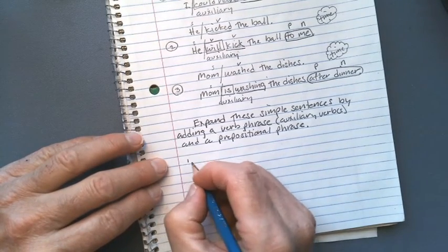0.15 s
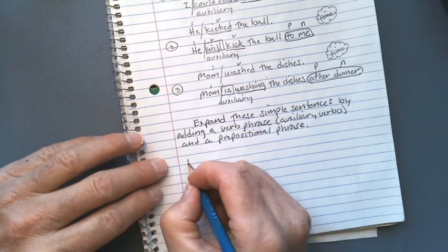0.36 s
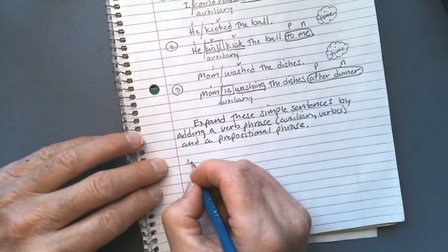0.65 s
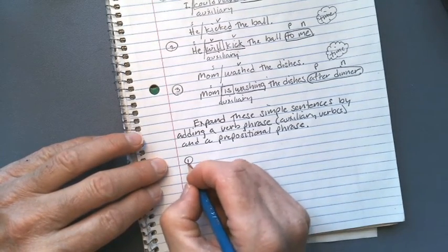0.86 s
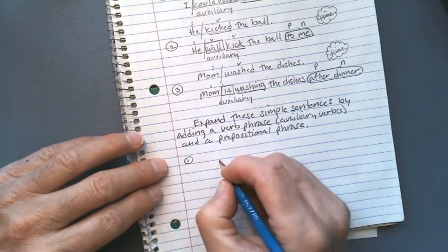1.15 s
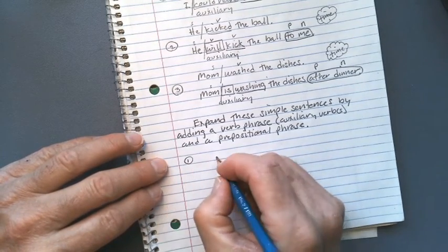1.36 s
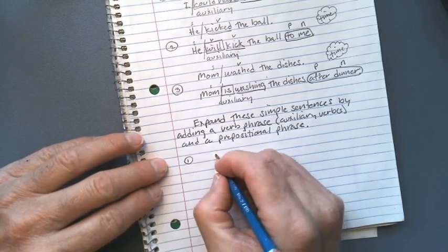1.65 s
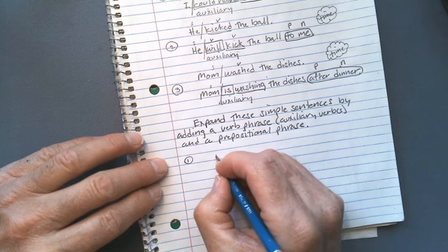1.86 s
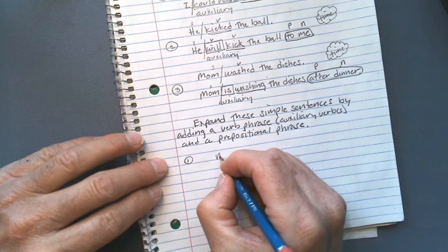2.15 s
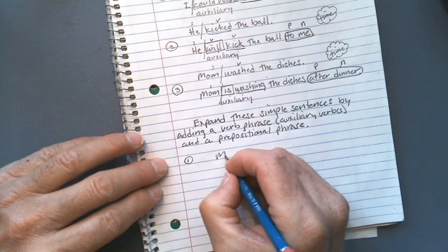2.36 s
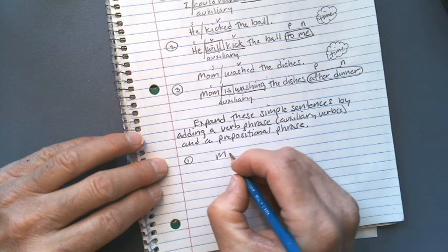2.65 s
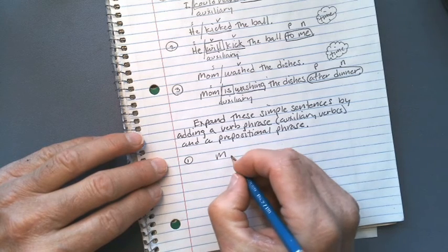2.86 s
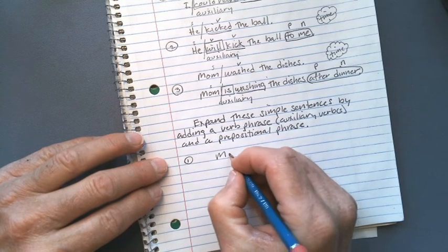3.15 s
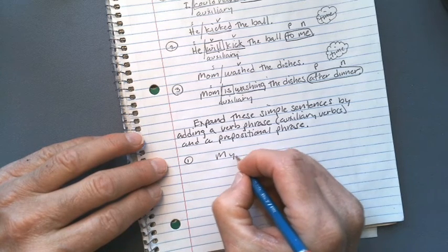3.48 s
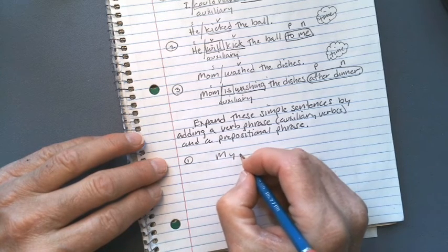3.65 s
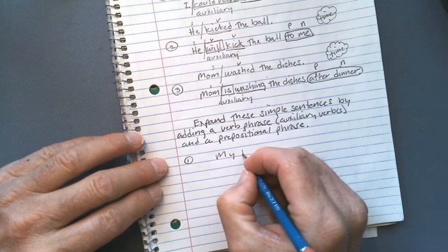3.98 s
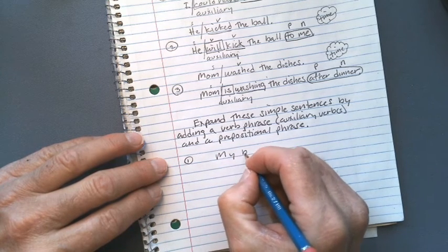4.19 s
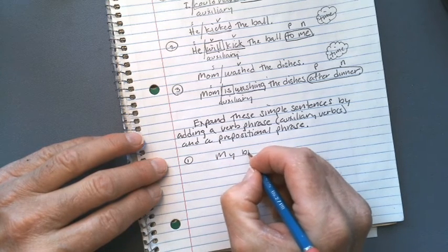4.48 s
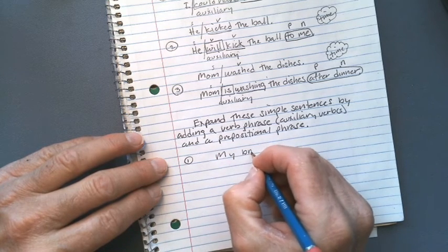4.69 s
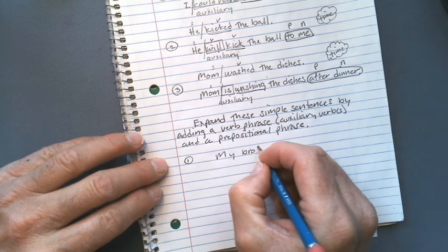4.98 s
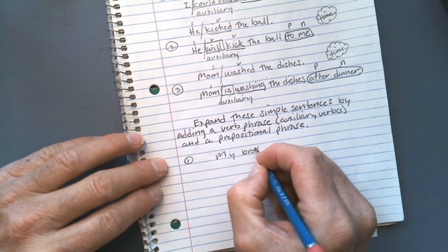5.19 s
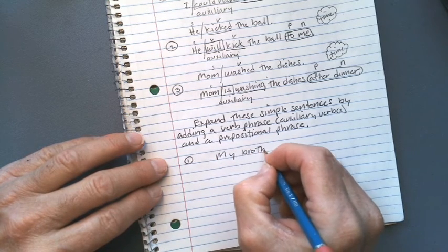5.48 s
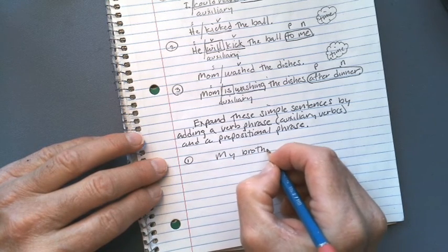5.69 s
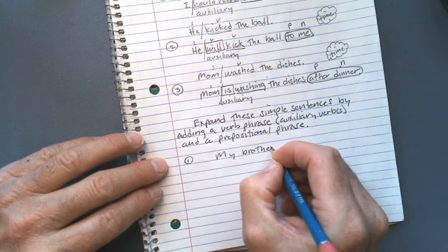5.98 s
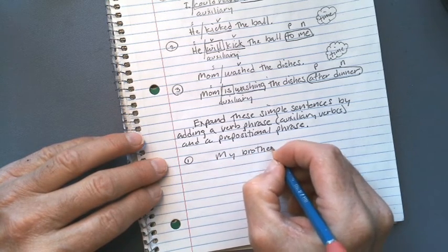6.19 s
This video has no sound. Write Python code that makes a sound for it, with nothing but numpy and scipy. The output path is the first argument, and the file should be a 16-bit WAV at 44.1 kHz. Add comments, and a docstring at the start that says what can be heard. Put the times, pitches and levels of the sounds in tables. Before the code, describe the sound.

Quiet handwriting: brief papery pencil scrapes and a few soft slides, dull deep bumps through the desk, over low room hum and faint hiss.

```python
"""Short dry scratches of a pencil, with a few softer slides, over low thuds of a desk and a quiet room.
The lead scrapes over paper fibres and rings the pencil: random clicks drive banks of resonances.
The hand pushes the desk, on which the notebook lies, into a low wobble with an uneven shake around it.
Mains hum is a pair of wavering tones; rumble, drone and hiss of air in the room are shaped noise."""
import sys
import numpy as np
from scipy import signal
from scipy.fft import rfft, irfft
from scipy.io import wavfile
from scipy.ndimage import uniform_filter1d

SR = 44100
rng = np.random.default_rng(int(sys.argv[2]) if len(sys.argv) > 2 else 0)


def volts_from_db(level):
    """Convert decibel levels to linear amplitude ratios."""
    exponent = np.asarray(level, float) / 20
    return 10 ** exponent


def unload_audio(sound):
    """Save the sound as a 16-bit wav file, at the path given as the first command line argument."""
    columns = np.transpose(np.atleast_2d(sound))
    # keep every value between -1 and 1, then stretch to whole-number steps
    steps = np.round(np.clip(columns, -1, 1) * 32767)
    wavfile.write(sys.argv[1], SR, steps.astype(np.int16))


N = 279153  # samples in the scene


def pencil():
    """The lead strokes the paper, and the hand and lightly resting lead glide on to the next letter."""
    # strokes of the lead: (peak time [s], length [s], strength [dB],
    #   speed, lifts the upper ring [dB], pressure, lifts the wooden shaft [dB])
    strokes = [(0.009, 0.07, -85.0, 5.0, 0.0), (0.549, 0.11, -71, 3.5, -11),
               (0.576, 0.06, -67.5, 4.0, -19.0), (0.603, 0.053, -72, 5, 3), (0.645, 0.13, -68.5, 1, -1),
               (0.686, 0.055, -64.5, 4, -8.5), (0.748, 0.072, -72.0, 3.5, 4.5),
               (1.526, 0.055, -81.0, 3.0, -5.0), (1.793, 0.089, -70.5, 1.0, -3.0),
               (1.919, 0.077, -66.0, 0.5, -6.0), (2.021, 0.057, -68, -2.0, 0.5),
               (2.125, 0.057, -63.5, -1.0, -9), (2.202, 0.06, -65.5, -3.5, -2.0),
               (3.149, 0.074, -74.5, -5.0, 2.5), (3.225, 0.048, -69.5, 3, -2), (3.298, 0.075, -69, 0.5, 6),
               (3.879, 0.064, -68.0, -6.0, 1.5), (3.992, 0.078, -68.5, -1.5, -2.5),
               (4.054, 0.057, -70.5, -3.5, 1.0), (4.127, 0.12, -76.5, -1.0, 2.5),
               (4.344, 0.052, -70.5, -2, 0.0), (4.452, 0.081, -73.5, 0.0, 3.0),
               (4.545, 0.091, -73.0, -4.0, 1.5), (4.631, 0.058, -70.5, 1, -3),
               (4.697, 0.069, -71.0, -3.0, 1.5), (4.906, 0.071, -67.5, -3.5, 1.0),
               (5.149, 0.097, -72.5, 3.5, -8.0), (5.169, 0.056, -70.0, -5.0, -8.0),
               (5.219, 0.066, -67.5, -6, 2.0), (5.33, 0.047, -70, 1.0, -2), (5.401, 0.066, -71, -4.5, 0.5),
               (5.484, 0.076, -79.0, 2, -11.0), (5.657, 0.07, -75, 2.0, 3.0), (5.733, 0.079, -70.5, 0, 2),
               (5.818, 0.077, -67.5, 0.5, -4.0), (6.224, 0.05, -69, -8.0, -4), (6.326, 0.05, -65.5, 0, -5)]
    # glides to the next letter: (peak time [s], length [s], level [dB])
    slides = [(0.851, 0.075, -63), (2.402, 0.13, -67), (3.396, 0.055, -69.5), (3.446, 0.084, -67),
              (5.922, 0.106, -71.5), (6.002, 0.11, -71), (6.085, 0.14, -76)]
    out = np.zeros(N + 2 * SR)  # a spare second at each end
    grips = rng.standard_normal((len(strokes), 3, 2, 5))  # stroke, part, (level, shift), mode
    slants = rng.standard_normal(len(strokes))
    for row, grip, slant in zip(strokes, grips, slants):
        sound = stroke(row, grip, slant)
        start = round((1 + row[0] - row[1]) * SR)
        out[start:][:len(sound)] += sound
    for peak_s, length_s, level_db in slides:
        sound = slide(length_s, level_db)
        start = round((1 + peak_s - length_s) * SR)
        out[start:][:len(sound)] += sound
    return out[SR:SR + N]


def stroke(row, grip, slant):
    """The lead rasps on paper and rings the pencil; speed lifts the upper ring, pressure the shaft."""
    # what the pencil rings with, by part:
    # (frequency [Hz], width [Hz], level [dB], gain per dB of lean [dB])
    shaft = [(1035, 600, -1.5, -0.35), (1670, 320, -4.5, -.5), (2320, 350, -3.5, -.4), (2755, 630, -1.5, 0),
             (3130, 330, -5, -0.6)]
    middle = [(6000, 660, -1, -0.12), (6580, 510, 0, -.9), (7460, 550, 0, .8), (8200, 450, -2, 0.58),
              (8840, 450, -3, .1)]
    upper = [(9520, 450, -4, -0.78), (10180, 410, -2, -.2), (10830, 550, 1, 0.55), (11700, 450, -1.5, -.6),
             (12500, 500, -8, .1)]
    # broad rasp of the paper: (frequency [Hz], level [dB])
    paper = [(800, -3), (1500, -6), (3000, -9), (4500, -2), (5200, -7), (6000, -4), (12000, -5.5),
             (13050, -3), (13600, 3), (14300, 0), (14900, 2), (15700, 1)]
    peak_s, length_s, strength_db, speed_db, pressure_db = row
    # the slant shifts weight between modes and drifts as the hand crosses the page
    lean_db = -3.5 + 1.3 * peak_s + 0.5 * slant
    fibres, swell = rub(length_s)
    rasp_db = -0.3 + np.mean([0, speed_db, pressure_db])  # against the mean of the three rings
    sound = volts_from_db(rasp_db) * colour(fibres, paper)
    sound += ring(fibres, middle, lean_db, grip[0])
    sound += volts_from_db(speed_db) * ring(fibres, upper, lean_db, grip[1])
    sound += volts_from_db(pressure_db) * ring(fibres, shaft, speed_db - pressure_db, grip[2])
    return volts_from_db(strength_db) * swell * sound


def slide(length_s, level_db):
    """Skin and resting lead brush over the fibres; coloured by a smooth spectrum, without a ring."""
    # brushing sound: (frequency [Hz], level [dB])
    skin = [(1500, -0.5), (3000, -6.5), (4800, -3.5), (6200, 0), (7700, -5.5), (9000, -1), (10500, -4.5),
            (12500, -9), (15700, -18)]
    fibres, swell = rub(length_s)
    return volts_from_db(level_db) * swell * colour(fibres, skin)


def rub(length_s, fibres_per_s=16000, spread_db=1.6, flutter_db=1.0, rise=0.37, flat=2.5):
    """Paper fibres snapping at random, and the swell of one movement: quick start, slower lift."""
    t = np.arange(-length_s, 1.1 * length_s, 1 / SR)  # 0 at the peak
    side_share = np.where(t < 0, rise, 1 - rise)
    speed = np.exp(-abs(t / side_share / length_s) ** flat)
    hit, size, side, grain = rng.random((len(t), 4)).T
    snaps = hit < fibres_per_s / SR
    fibres = snaps * np.sign(side - 0.5) * volts_from_db(-spread_db * np.log(size + 1e-4))
    tooth = evened(uniform_filter1d(grain - 0.5, size=200))  # paper is uneven over a few ms
    return fibres, speed * volts_from_db(flutter_db * tooth)


def ring(x, modes, lean_db, grip, grip_db=2.5, shift=0.013):
    """Steep-skirted modes added in power; the grip changes the level and pitch of each a little; rms 1."""
    hz = np.fft.rfftfreq(len(x), 1 / SR)[:, None]
    mode_hz, width_hz, level_db, response = np.transpose(modes)
    level_db = level_db + lean_db * response + grip_db * grip[0]
    mode_hz = mode_hz * (1 + shift * grip[1])
    power = volts_from_db(2 * level_db) / (1 + (2 * (hz - mode_hz) / width_hz) ** 2) ** 2
    return evened(irfft(rfft(x) * np.sqrt(power.sum(axis=1)), len(x)))


def desk():
    """Each push swings the desk top at its low mode, with a looser shake around it, then it dies away."""
    # pushes of the hand on the desk: (start [s], length [s], level [dB])
    pushes = [(0.0, 0.039, -45.5), (0.054, 0.051, -51), (0.49, 0.086, -43.5), (0.607, 0.096, -46.5),
              (0.82, 0.1, -43.5), (1.392, 0.209, -53), (1.916, 0.13, -43.5), (2.04, 0.06, -49.0),
              (2.147, 0.15, -43), (2.469, 0.077, -53.5), (2.719, 0.076, -53.5), (2.819, 0.087, -49.5),
              (3.113, 0.076, -46), (3.265, 0.06, -46.5), (3.329, 0.068, -46.5), (3.426, 0.076, -47.9),
              (3.851, 0.14, -38.5), (4.156, 0.086, -51.3), (4.32, 0.066, -53.5), (4.424, 0.113, -41),
              (4.635, 0.136, -53), (4.77, 0.059, -54), (4.877, 0.1, -39), (5.016, 0.057, -44.5),
              (5.098, 0.11, -37.5), (5.264, 0.098, -45), (5.569, 0.097, -40), (5.832, 0.093, -42.5),
              (5.993, 0.13, -49), (6.238, 0.1, -43)]
    desk_hz, spread_hz = 40.7, 1.1  # the weight of the hand moves the wobble a little each time
    rise_s, decay_db_per_s = 0.025, 170.5
    let_go = 0.72  # share of the length after which the push dies away
    rest_db, rest_waver_db = -61, 3  # faint wobble under the resting hand
    shake_db = -9  # against the wobble
    t = np.arange(N) / SR
    power = volts_from_db(2 * (rest_db + rest_waver_db * wander(3.0)))
    pull = np.zeros(N)
    for (start_s, length_s, level_db), offset in zip(pushes, rng.standard_normal(len(pushes))):
        rise = 0.5 + 0.5 * np.tanh((t - start_s) / rise_s)
        free_s = np.maximum(t - start_s - let_go * length_s, 0)
        push = (rise * volts_from_db(level_db - decay_db_per_s * free_s)) ** 2
        power = power + push
        pull = pull + offset * push
    hz = desk_hz + spread_hz * pull / power  # the strongest push sets the pitch
    swing = np.sqrt(2) * np.sin(2 * np.pi * (np.cumsum(hz) / SR + rng.random()))
    shake = colour(rng.standard_normal(N), [(8, -10.5), (16, -2.5), (27, -5.5), (38, 0.5),
                                            (52, -0.5), (75, -10), (95, -50.0)])
    return np.sqrt(power) * (swing + volts_from_db(shake_db) * shake)


def hum():
    """Mains tones: sines whose levels waver a little."""
    # (frequency [Hz], level [dB], wavering [dB rms])
    tones = [(60.13, -52, 1.25), (120.65, -62.5, 1.5)]
    t = np.arange(N) / SR
    out = np.zeros(N)
    for hz, level_db, waver_db in tones:
        level = volts_from_db(level_db + waver_db * wander(4.6))
        out += np.sqrt(2) * level * np.sin(2 * np.pi * (hz * t + rng.random()))
    return out


def room(swell_db=0.6):
    """Rumble, and the drone and hiss of moving air; room modes lift peaks in the drone."""
    # noise spectra: (frequency [Hz], level [dB])
    air_spectrum = [(76, -34), (130, -5.5), (146, -13.5), (198, -2.5), (258, -3), (332, -8), (513, -12),
                    (706, -16), (765, -18.5), (2000, -29), (2600, -54), (4400, -120)]
    rumble_spectrum = [(5, 5), (18, 1.5), (26, -9), (45, -8.5), (75, -8.5), (100, -16.5), (150, -26),
                       (170, -57)]
    hiss_spectrum = [(1180, -41), (2000, -2), (3380, -2.5), (3880, -3), (4660, -5), (5030, -3.5),
                     (5480, -5.5), (7540, -9), (9520, -5), (14200, -8.5), (15700, -10)]
    # room modes that lift the drone: (frequency [Hz], width [Hz], lift [dB])
    room_modes = [(210.2, 10, 5), (279, 60, 2), (379, 25, 5), (412, 16, 5.5), (518, 40, 6.5),
                  (609, 22, 2.5), (759.3, 30, 10), (1072, 20, 4), (1322, 30, 5)]
    air_db, rumble_db, hiss_db = -56, -54, -69
    air = volts_from_db(air_db + swell_db * wander(4.3)) * colour(rng.standard_normal(N), air_spectrum, room_modes)
    hiss = volts_from_db(hiss_db) * colour(rng.standard_normal(N), hiss_spectrum)
    rumble = volts_from_db(rumble_db) * colour(rng.standard_normal(N), rumble_spectrum)
    return air + rumble, hiss


def echoes(x):
    """Adds a short tail of reflections off the desk and walls, which ripples the spectrum finely."""
    echo_db, t60_s = -12.5, 0.098
    t = np.arange(SR // 4) / SR
    tail = rng.standard_normal(len(t)) * volts_from_db(-60 * t / t60_s) * (t > 0.002)
    tail *= volts_from_db(echo_db) / np.linalg.norm(tail)
    reflected = signal.oaconvolve(x, tail)[:N]
    return (x + reflected) / np.sqrt(1 + volts_from_db(2 * echo_db))  # keeps the overall power


def evened(x):
    """Scales to rms 1."""
    return x / np.sqrt(np.mean(x ** 2) + 1e-20)


def read(points, hz):
    """Reads a spectrum table on a log-frequency axis."""
    point_hz, value = np.transpose(points)
    return np.interp(np.log(hz + 1), np.log(point_hz + 1), value)


def colour(x, points, peaks=()):
    """Shapes a sound by a spectrum, lifted around each peak; rms 1."""
    hz = np.fft.rfftfreq(len(x), 1 / SR)
    lift_db = sum(db / (1 + (2 * (hz - peak_hz) / width_hz) ** 2) for peak_hz, width_hz, db in peaks)
    return evened(irfft(rfft(x) * volts_from_db(read(points, hz) + lift_db), len(x)))


def wander(cutoff_hz):
    """Slow random drift of rms 1: low-passed noise, its first second dropped to settle the filter."""
    low_pass = signal.butter(2, cutoff_hz, fs=SR, output="sos")
    return evened(signal.sosfilt(low_pass, rng.standard_normal(N + SR))[SR:])


def scene():
    """Everything reaches one capsule, so both channels are alike; pencil and hiss carry the echoes."""
    drone, hiss = room()
    mono = echoes(pencil() + hiss) + desk() + hum() + drone
    return np.tile(mono, (2, 1))


def top_cut(x):
    """Nothing passes above the cut-off."""
    return signal.sosfilt(signal.butter(12, 15910, fs=SR, output="sos"), x)


def record(dry):
    """Sets a faint noise of opposite sign in the two channels, so they differ slightly, and cuts the top of the
    band."""
    # faint noise unlike in the channels: (frequency [Hz], level [dB])
    side_spectrum = [(400, -11.5), (800, -1), (1500, -1), (2500, 0.5), (4500, 1.5), (7000, 0), (10000, 7.5),
                     (15700, 5)]
    side = volts_from_db(-82) * colour(rng.standard_normal(N), side_spectrum)
    stereo = dry + side * np.array([[1], [-1]])
    low_pass = signal.firwin(1023, 15740, window=("kaiser", 9), fs=SR)  # edge in Hz
    mix = signal.oaconvolve(stereo, low_pass[None], "same")
    return top_cut(mix)


dry = scene()
out = record(dry)
unload_audio(out)
```